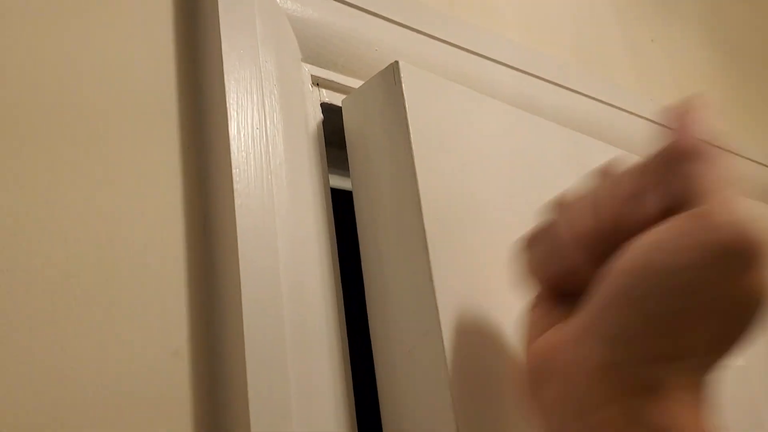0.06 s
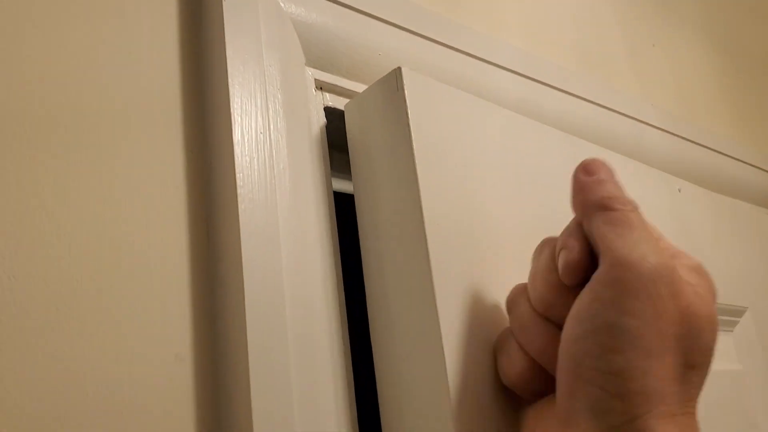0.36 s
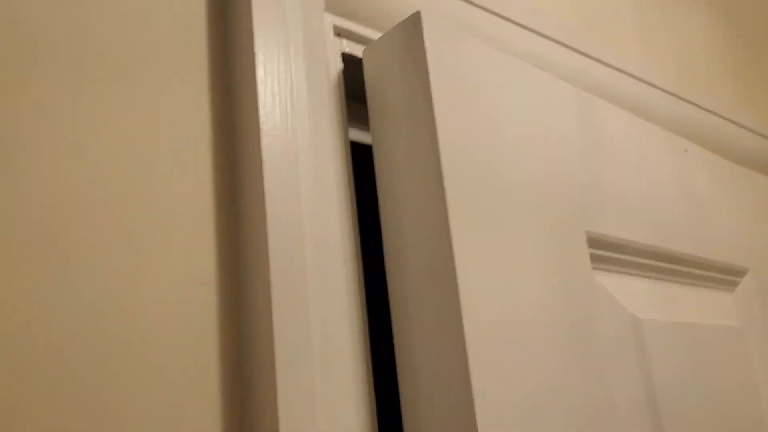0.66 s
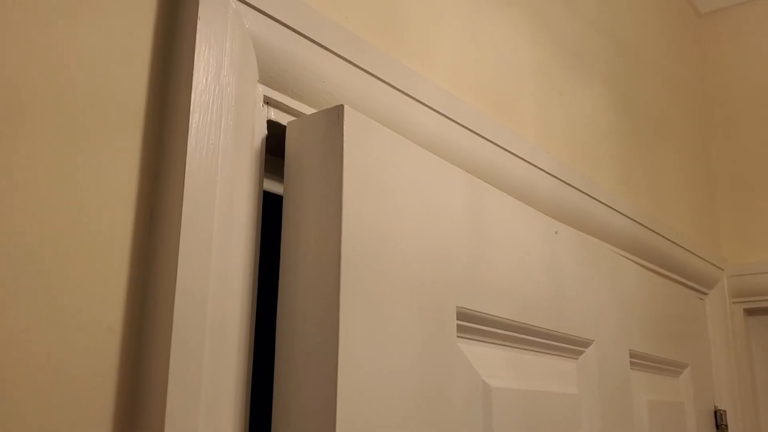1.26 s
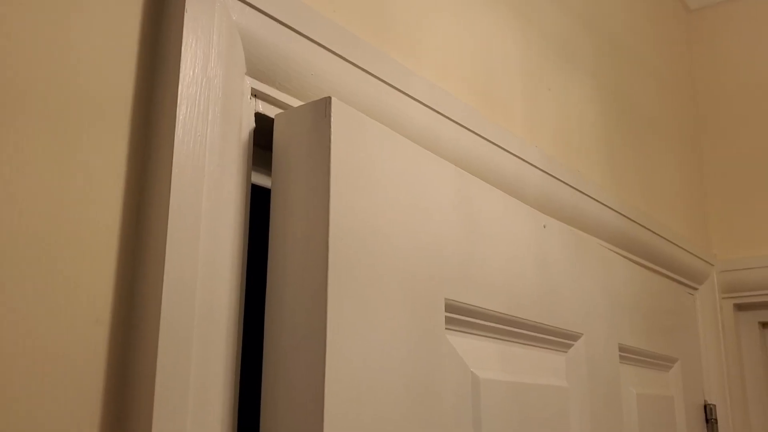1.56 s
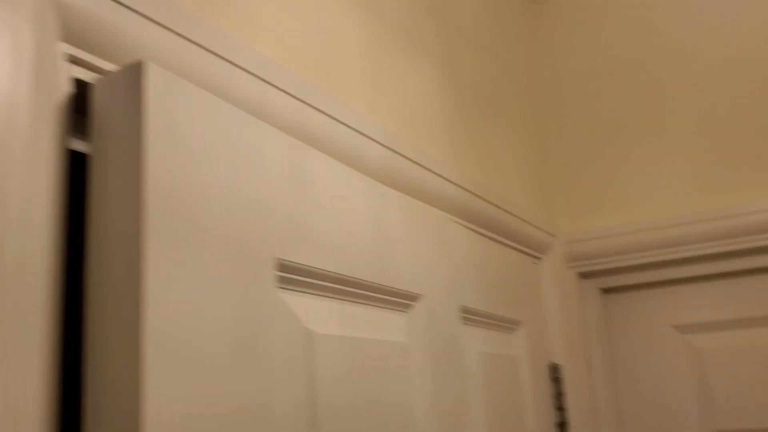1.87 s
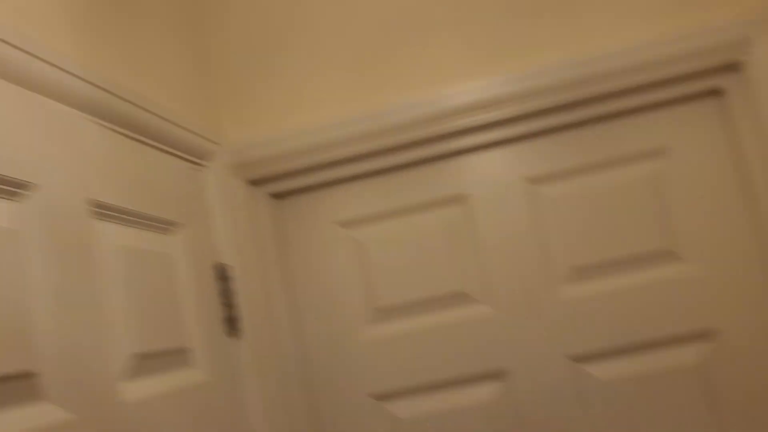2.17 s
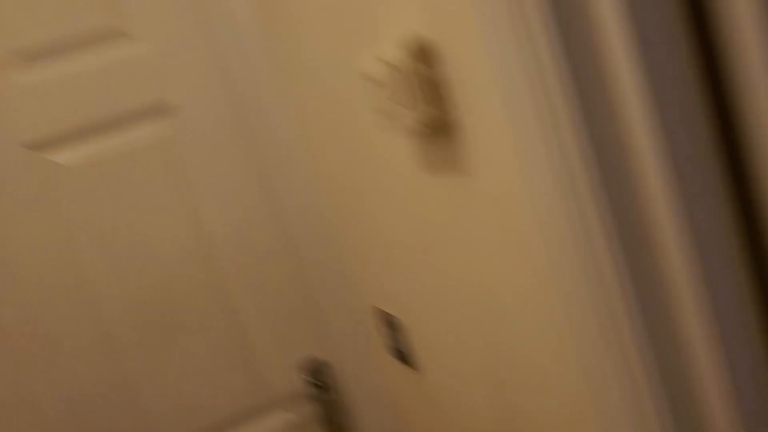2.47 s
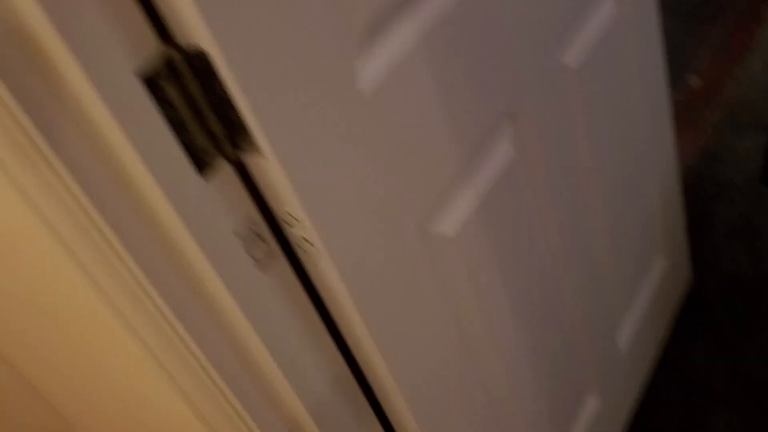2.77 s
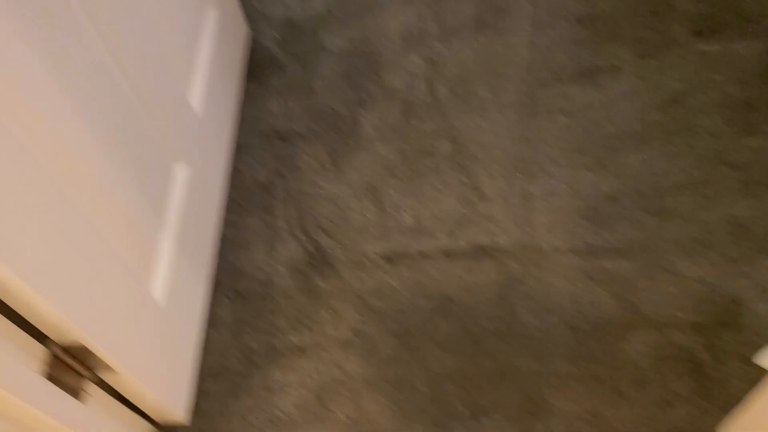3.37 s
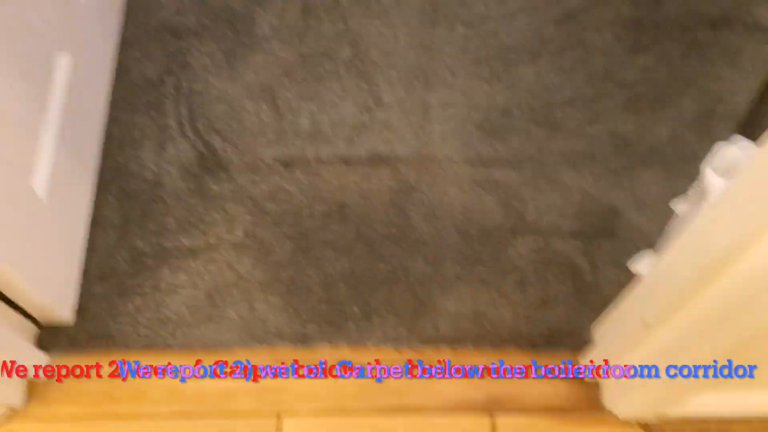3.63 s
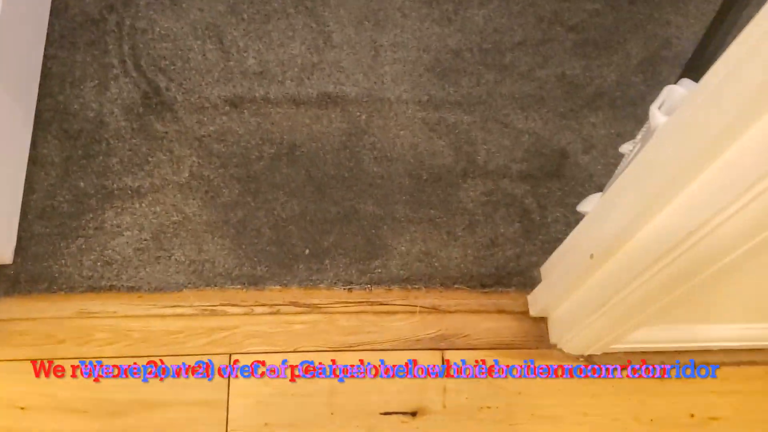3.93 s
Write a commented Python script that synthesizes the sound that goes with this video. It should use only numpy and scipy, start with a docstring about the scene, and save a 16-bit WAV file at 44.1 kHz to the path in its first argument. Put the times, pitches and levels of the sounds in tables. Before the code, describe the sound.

Close, booming knocks rattle a wooden door, followed by faint cloth rustle and hum.

```python
"""A small hallway, a stereo microphone close to a light wooden door that stands ajar.
In the first half second a fist knocks: the leaf booms, its panels ring, its fittings rattle.
Then sleeves swish as someone turns away, and the microphone's case clicks once. Near three seconds
the holding hand bumps the left port and something rubs with a thin rasp.
A low machine hum and faint air noise carry on underneath to the end."""
import sys
import numpy as np
from scipy import signal
from scipy.fft import rfft, irfft
from scipy.io import wavfile
from scipy.ndimage import uniform_filter1d

SR = 44100
rng = np.random.default_rng(int(sys.argv[2]) if len(sys.argv) > 2 else 0)


def persist_wave(psi):
    """Save psi, clipped to +-1, as 16-bit WAV."""
    counts = np.round(np.clip(psi, -1, 1) * 32767).astype(np.int16)
    wavfile.write(sys.argv[1], SR, np.atleast_2d(counts).T)


N = 176400
T = np.arange(N) / SR
FREQS = np.fft.rfftfreq(N, 1 / SR)


def door():
    """Close to the microphone, each blow pushes the leaf away, rings the panels, shakes the fittings."""
    # blows of fist and rattling door: t/s, then boom, wood, clack of fittings, tick, each as level/dB
    blows = [(-.012, -20, -28, -31, -69), (0.037, -21.5, -29, -28.5, -37), (0.183, -20, -39, -46.5, -44.5),
             (.195, -19.5, -27, -48, -64.5), (0.2029, -7.5, -18, -30.5, -56.5),
             (.222, -34.5, -25.5, -43.5, -53.5), (0.256, -29, -32.5, -30, -55),
             (.264, -39.5, -36, -37.5, -63), (0.366, -25.5, -42, -49, -49),
             (.384, -15.5, -37.5, -50.5, -49.5), (.408, -19, -35.5, -27.5, -38.5),
             (.425, -40, -34.5, -34.5, -53), (0.444, -26.5, -37, -32, -49.5),
             (.506, -27.5, -37.5, -29.5, -38)]
    leaf_modes = [(37.29, -4, 1), (67.17, 6, 0.32), (84.1, -7.5, 0.55), (106.6, -9.5, 0.3)]  # the whole leaf swinging: f/Hz, level/dB, t60/s
    panel_modes = [(177, -2.5), (208.5, 2.5), (242, -5), (277.5, -0.5), (343, 3), (410, -8), (651, -6),
                   (772, 1.5), (883, -9), (1049, -0.5), (1204, 4.5), (1390, 3)]  # resonances of the panels: f/Hz, level/dB
    # spectra of the dense ringing of wood, fittings and sharp ticks: f/Hz, level/dB
    wood_shape = [(60, -9), (120, 6.5), (320, 1.5), (900, -0.5), (2000, -6), (3200, -16), (15000, -51.5)]
    clack_shape = [(150, -15.5), (700, -3.5), (2200, -1.5), (3100, 2), (7000, -15), (10000, -18),
                   (15000, -41.5)]
    tick_shape = [(500, -24.5), (2500, -7), (7500, 3.5), (15500, -2.5)]
    times, boom_db, wood_db, clack_db, tick_db = np.array(blows).T
    leaf = -ring(times, boom_db, leaf_modes, contact_s=0.01, lag_s=0.00097)
    panel_t60_s = 0.26
    damped_modes = [(hz, db, panel_t60_s) for hz, db in panel_modes]
    panels = ring(times, wood_db - 11.5, damped_modes, contact_s=0.00061, lag_s=0.00021, spread_db=2.5)
    wood = chatter(times, wood_db, wood_shape, t60=0.089, attack_s=0.0019, room_db=-3)
    clack = chatter(times, clack_db, clack_shape, t60=0.072, attack_s=0.0008, room_db=-3)
    tick = chatter(times, tick_db, tick_shape, t60=0.17, attack_s=0.0008, room_db=-4)
    return leaf + panels + ripple(wood + clack + tick)


def knuckles():
    """Knuckles click on the paint and slide over it, too close to stir the room."""
    contacts = [(0.036, -16.5, 910), (0.1809, -26.5, 14200), (0.407, -26.5, 5250), (0.4249, -26, 910),
                (0.5054, -20, 950)]  # dry clicks at the instant of contact: t/s, level/dB, f/Hz
    slides = [(0.197, .066, -54), (0.393, 0.07, -60.5)]  # skin sliding on paint: t/s, length/s, level/dB
    clicks = sum(narrow(hz, width_hz=hz / 2) * undb(db) * fade(s, t60=0.0096, attack_s=0.0004)
                 for s, db, hz in contacts)
    sliding = sum(undb(db) * (T > s) * np.exp(-np.maximum(T - s - length, 0) / 0.012)
                  for s, length, db in slides)
    return clicks + sliding * narrow(13180, width_hz=8700)


def sleeves():
    """Cloth slides in short, grainy swishes and squeaks where it catches."""
    swishes = [(0.744, 0.037, 0.04, -60.5, -72.5), (1.13, 0.72, 0.089, -78, -77.5),
               (1.815, 0.033, 0.038, -71, -100), (2.219, 0.018, 0.09, -58.5, -66),
               (2.37, 0.089, 0.037, -61.5, -67.5), (2.536, 0.0093, 0.038, -60, -59.5),
               (2.62, 0.069, 0.05, -53.5, -57), (2.92, 0.13, 0.16, -64, -96),
               (3.059, 0.075, 0.069, -59.5, -67.5), (3.285, 0.048, 0.057, -55.5, -59.5)]  # strokes of cloth: peak t/s, rise/s, fall/s, swish level/dB, rub level/dB
    catches = [(2.531, 3140, -52), (2.533, 1120, -52), (2.556, 2750, -51), (2.602, 2160, -50),
               (2.607, 1660, -48), (3.053, 1760, -58.5), (3.264, 3430, -47), (3.269, 1730, -60.5)]  # brief squeaks: t/s, f/Hz, level/dB
    # spectra of the bright swish and the lower rub: f/Hz, level/dB
    swish_shape = [(400, -1.5), (1200, -22), (1700, -5), (2200, -1), (3000, 1.5), (7200, -9.5),
                   (15500, -17.5)]
    rub_shape = [(100, 0), (600, -2.5), (1050, -1.5), (1750, 0.5), (8000, -31.5)]
    grain_db, grain_samples = 0.7, int(0.003 * SR)
    roughness = np.sqrt(grain_samples) * uniform_filter1d(rng.standard_normal(N), grain_samples)
    swish_power, rub_power = 0, 0
    for s, rise, fall, swish_db, rub_db in swishes:
        speeding_up = np.exp(-((T - s) / rise) ** 2)
        slowing = np.cosh(np.minimum(abs(T - s) * 2 / fall, 20)) ** -0.5
        speed = np.where(T < s, speeding_up, slowing)
        swish_power += (speed * undb(swish_db)) ** 2
        rub_power += (speed * undb(rub_db)) ** 2
    squeaks = sum(narrow(hz, width_hz=450) * undb(db) * fade(s, t60=0.18, attack_s=0.0027)
                  for s, hz, db in catches)
    grain = undb(grain_db * roughness)
    swish = colour(diffuse() * grain * np.sqrt(swish_power), swish_shape)
    rub = colour(diffuse() * grain * np.sqrt(rub_power), rub_shape)
    return ripple(swish + rub + grain * squeaks)


def hand_bumps():
    """Right on the microphone, the shifting hand thuds on the left port and rubs the case."""
    bumps = [(2.688, -34, -66), (2.868, -28, -60), (2.932, -32.5, -51.5), (2.99, -33, -55)]  # touches of the hand: t/s, thud level/dB, rub level/dB
    thud_modes = [(69.5, 6.5, 0.28)]  # the bumped port's resonance: f/Hz, level/dB, t60/s
    scuff_shape = [(130, 1.5), (480, -7.5), (750, -20), (8000, -49)]  # spectrum of the hand on the case: f/Hz, level/dB
    times, thud_db, rub_db = np.array(bumps).T
    thuds = -ring(times + 0.0035, thud_db, thud_modes, contact_s=0.0068)
    scuffs = chatter(times, rub_db, scuff_shape, t60=0.14, attack_s=0.0022, room_db=5)
    return thuds * undb([[0], [-42]]) + scuffs * undb([[1], [-4]])


def rasp():
    """Something rubs during the turn: it sticks and slips, so its resonances pulse unevenly."""
    resonances = [(2130, 180, 1), (7030, 740, -7), (11300, 500, -11.5)]  # bands of the thin rasp: f/Hz, width/Hz, level/dB
    swell = [(2.76, -94), (2.8, -79), (3.04, -61.5), (3.17, -76.5), (3.29, -59.5), (3.5, -96)]  # course of the rubbing: t/s, level/dB
    slip_hz, slip_db = 89.5, 2.5
    tone = sum(undb(db) * narrow(hz, width) for hz, width, db in resonances)
    swell_db = np.interp(T, *np.array(swell).T, left=-np.inf, right=-np.inf)
    slips = np.interp(T * slip_hz, np.arange(1024), rng.standard_normal(1024))
    return tone * undb(swell_db + slip_db * slips / slips.std())


def case_click(start_s=1.217, level_db=-49, decay_s=0.0004):
    """One dull, dry click from the microphone's case, alike in both channels."""
    return undb(level_db) * (T >= start_s) * np.exp(-abs(T - start_s) / decay_s)


def machine_hum(pitch_hz=49.07, wander_share=0.0022):
    """Room tone, a little to the left: a motor of slightly wandering speed over faint air noise."""
    harmonics = [(1, -36), (2, -65), (3, -71), (5, -76.5)]  # the motor's partials: multiple, level/dB
    air_shape = [(25, -10), (80, 4.5), (130, -10.5), (400, -19.5), (1000, -25.5), (1800, -39.5),
                 (7000, -42.5), (15500, -37)]  # spectrum of the hallway's air: f/Hz, level/dB
    wander = np.interp(T, np.linspace(0, T[-1], 13), rng.standard_normal(13))
    phase = 2 * np.pi * np.cumsum(pitch_hz * (1 + wander_share * wander)) / SR
    motor = sum(undb(db) * np.sqrt(2) * np.sin(k * phase) for k, db in harmonics)
    air = undb(-59.5) * colour(diffuse(), air_shape)
    return (motor + air) * undb([[0.65], [-0.65]])


def ring(times, dbs, modes, contact_s, lag_s=0, spread_db=0):
    """Modes struck by smooth pushes; the left port hears them lag_s later."""
    age = T[:SR]
    waves = np.array([undb(db) * np.sin(2 * np.pi * hz * age) * np.exp(-np.log(1000) * age / t60)
                      for hz, db, t60 in modes])
    push = np.sin(np.pi * np.minimum((T[:SR // 20] + 1 / SR) / contact_s, 1)) ** 2
    out = np.zeros((2, N))
    for s, db in zip(times, dbs):
        strengths = undb(db + spread_db * rng.standard_normal(len(modes)))
        tone = signal.fftconvolve(strengths @ waves, push / push.sum())[:SR]
        for port, lag in enumerate((lag_s, 0)):
            out[port] += np.interp(T - s - lag + contact_s / 2, age, tone, left=0, right=0)
    return out


def chatter(times, dbs, shape, t60, attack_s, room_db, spiky_db=3):
    """Dense, spiky noise of struck things, followed by the hallway's tail band by band."""
    room_decay = [(100, .45), (400, 0.46), (3000, 0.29), (7000, 0.29), (11500, 0.25)]  # the hallway's reverberation: f/Hz, t60/s

    def envelope(decay, rise):
        return np.sqrt(sum((undb(db) * fade(s, decay, rise)) ** 2 for s, db in zip(times, dbs)))

    tail_spectrum = rfft(diffuse())
    spikes = undb(spiky_db * np.repeat(rng.standard_normal(N), SR // 2000)[:N])  # half-millisecond steps
    out = diffuse() * spikes / np.sqrt(np.mean(spikes ** 2)) * envelope(t60, attack_s)
    for band_hz, band_t60 in room_decay:
        share = at([(hz, hz == band_hz) for hz, _ in room_decay], FREQS)
        out += undb(room_db) * irfft(tail_spectrum * share, N) * envelope(band_t60, rise=0.0036)
    return colour(out, shape)


def ripple(x, depth_db=1.5, spacing_hz=16):
    """Close-set resonances of door and hallway leave irregular peaks and dips in a sound."""
    gain_db = depth_db * np.interp(FREQS / spacing_hz, np.arange(4096), rng.standard_normal(4096))
    return colour(x, np.column_stack([FREQS[1:], gain_db[1:]]))


def diffuse():
    """White noise as two spaced ports hear a room: alike in the bass, unlike above."""
    stereo_width = [(170, -10.5), (380, 3.5), (1300, 3), (4400, 0)]  # side relative to mid: f/Hz, level/dB
    mid, side = rfft(rng.standard_normal((2, N)))
    width = undb(at(stereo_width, FREQS))
    return irfft(np.array([mid + width * side, mid - width * side]) / np.sqrt(1 + width ** 2), N)


def narrow(centre_hz, width_hz):
    """Stereo noise in one resonance, rms 1."""
    detuning = 2 * (FREQS - centre_hz) / width_hz
    band = irfft(rfft(diffuse()) / (1 + detuning ** 2), N)
    return band / band.std()


def colour(x, points, keep_power=True):
    """Causal filter shaped by points of f/Hz, level/dB."""
    size = 2 * N
    gain = undb(at(points, np.fft.rfftfreq(size, 1 / SR)))
    if keep_power:
        gain /= np.sqrt(np.mean(gain ** 2))
    cepstrum = irfft(np.log(gain))
    cepstrum[1:N] *= 2  # folding onto positive time gives minimum phase
    cepstrum[N + 1:] = 0
    return irfft(rfft(x, size) * np.exp(rfft(cepstrum)))[..., :N]


def fade(start, t60, attack_s):
    """Quick rise, exponential fall."""
    age = np.maximum(T - start, 0)
    return (1 - np.exp(-age / attack_s)) * np.exp(-np.minimum(np.log(1000) * age / t60, 20))


def at(points, hz):
    """Read points of f/Hz, value on a log-frequency axis."""
    point_hz, values = np.array(points, float).T
    return np.interp(np.log(np.maximum(hz, 1)), np.log(point_hz), values)


def undb(db):
    """Decibels to gain."""
    return 10 ** (np.asarray(db) / 20)


def scene():
    """The close knocking, then the turn away, over the hallway's hum."""
    return door() + sleeves() + rasp() + hand_bumps() + knuckles() + case_click() + machine_hum()


def record(dry):
    """The microphone has a dip in the upper treble; the top is cut."""
    mic_response = [(10, -14), (28, -1.5), (7300, 1), (8400, -12.5), (9200, -13.5), (10800, -3.5),
                    (16000, 1.5)]  # the microphone's frequency response: f/Hz, level/dB
    top_cut = signal.ellip(10, 0.2, 70, 15850, fs=SR, output="sos")
    return signal.sosfilt(top_cut, colour(dry, mic_response, keep_power=False))


dry = scene()
out = record(dry)
persist_wave(out)
```